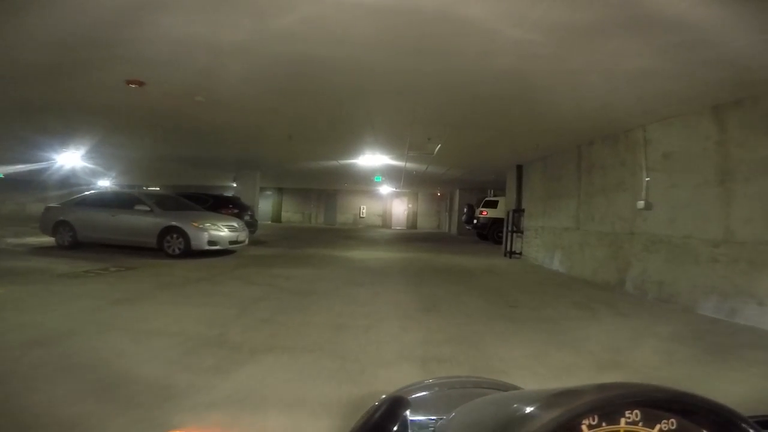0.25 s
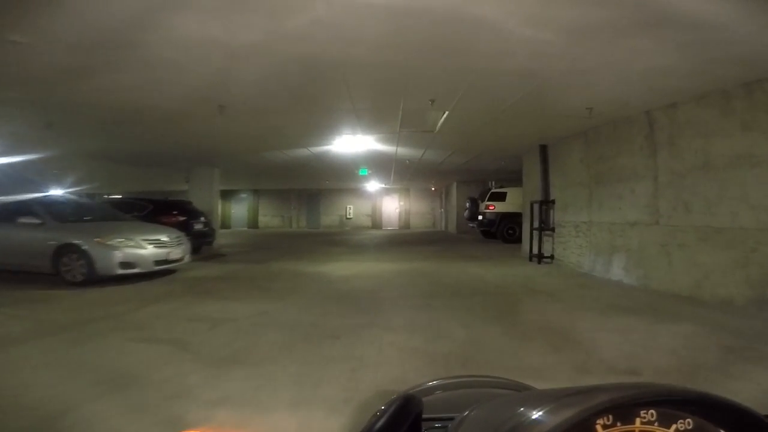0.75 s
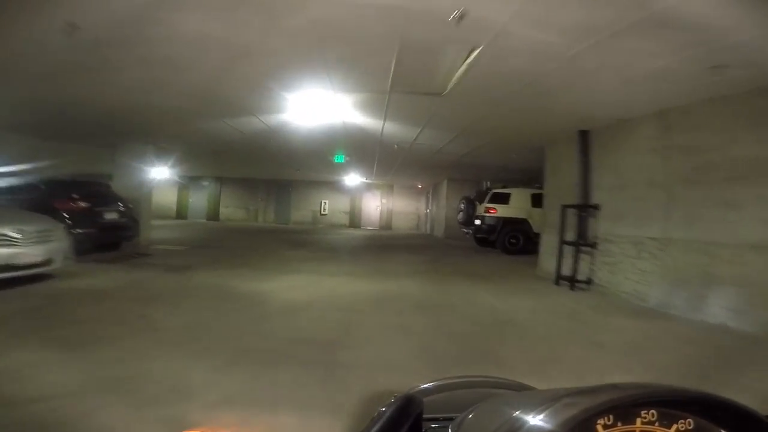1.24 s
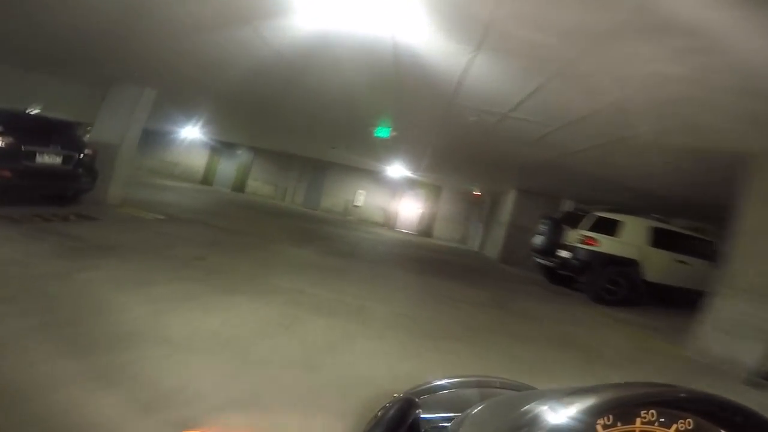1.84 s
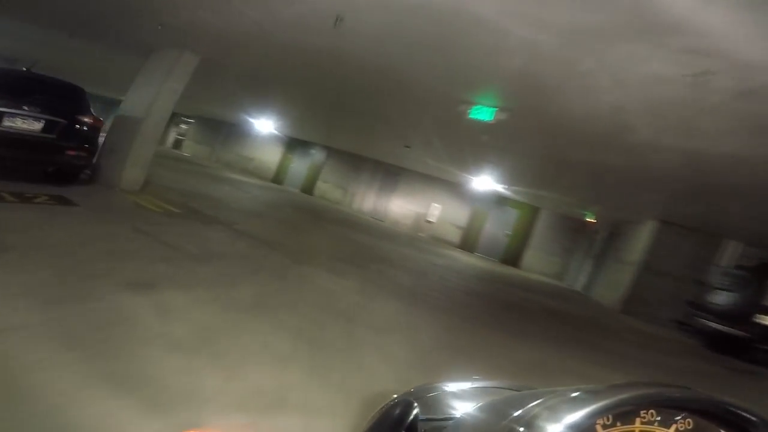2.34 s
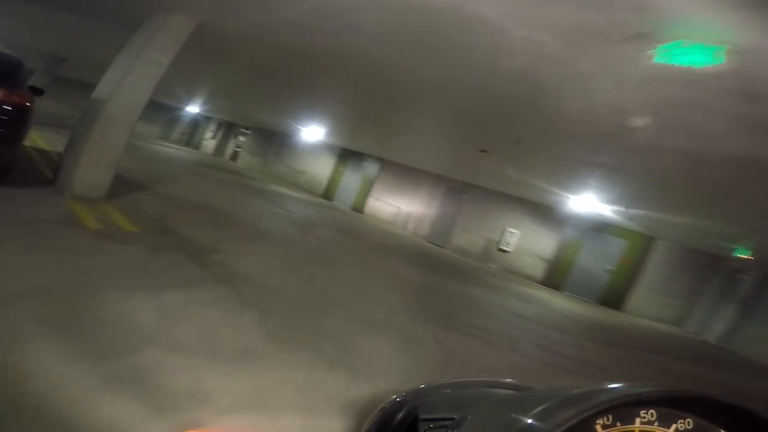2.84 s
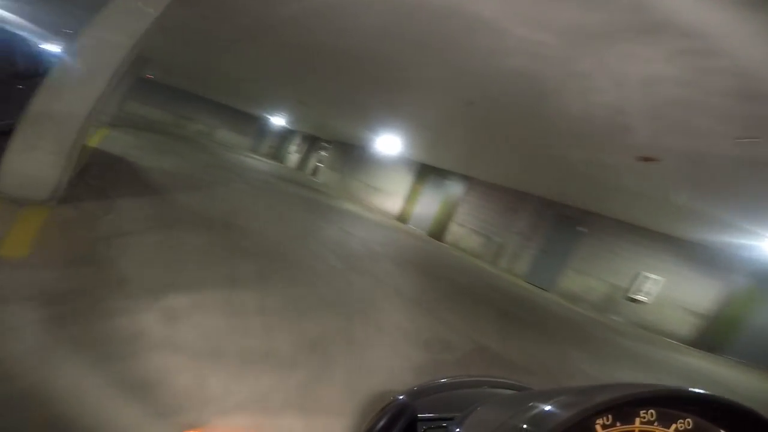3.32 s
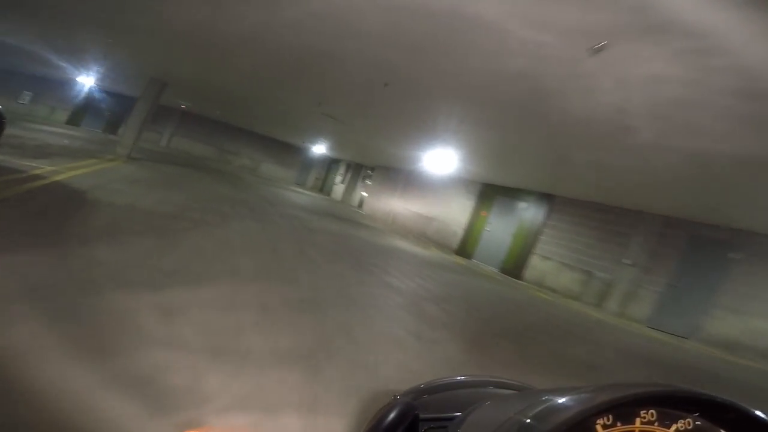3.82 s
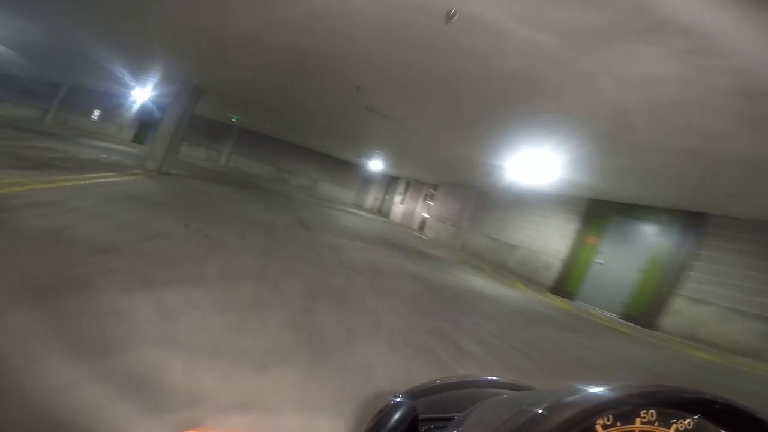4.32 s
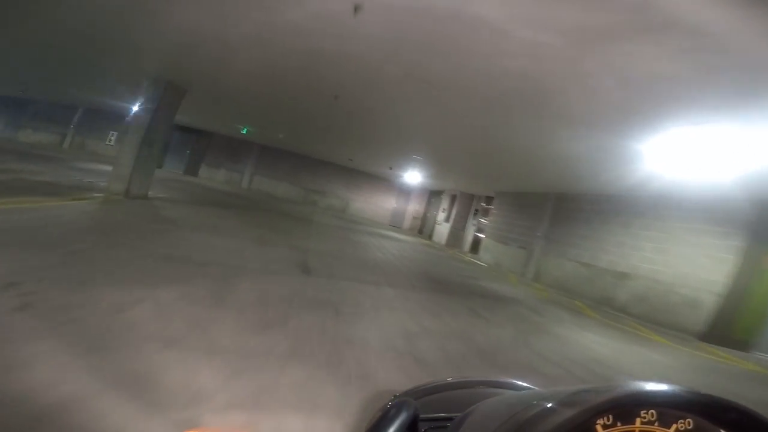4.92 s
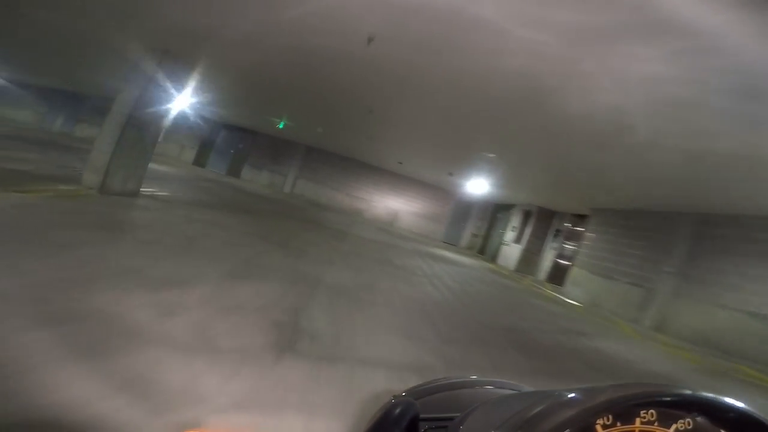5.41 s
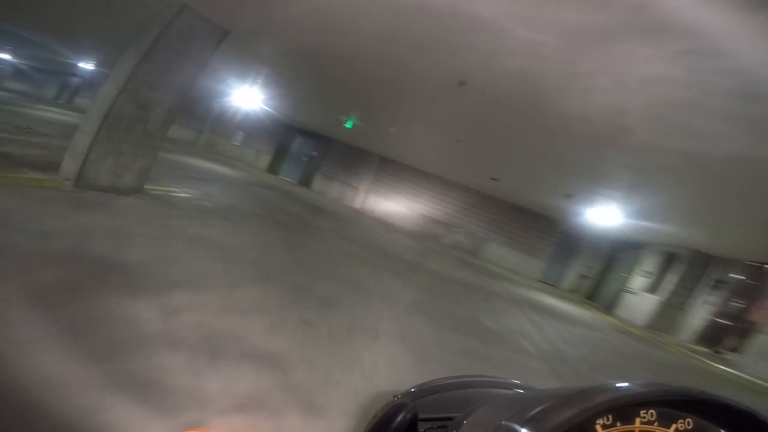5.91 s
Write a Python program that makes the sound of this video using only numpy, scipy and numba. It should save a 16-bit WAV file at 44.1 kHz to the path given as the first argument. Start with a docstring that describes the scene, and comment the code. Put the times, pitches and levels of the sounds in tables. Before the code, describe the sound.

A motorcycle drones slowly through a concrete parking garage while the camera knocks and rattles in its mount.

```python
"""A low exhaust drone and hollow knocks: a motorcycle rolls through a concrete parking garage,
slowly gaining speed from just above idle. Periodic firing gives the drone its harmonics, and the
scatter between firings a rumble in the hall; meshing gears whine and the valve gear hisses.
Engine vibration knocks the case of a camera on the bike against its mount, exciting its damped
modes, and gain control ducks after the hard knocks."""
import sys
import numpy as np
from scipy import signal
from scipy.fft import rfft, irfft, next_fast_len
from scipy.io import wavfile
from scipy.ndimage import uniform_filter1d, minimum_filter1d, map_coordinates
from numba import njit

SR = 44100
rng = np.random.default_rng(int(sys.argv[2]) if len(sys.argv) > 2 else 0)


def to_wav(sig):
    """Store sig (one row per channel, or 1-D mono) as 16-bit WAV at the path in sys.argv[1].

    Samples outside -1..1 are clipped; the rate is SR.
    """
    pcm = np.clip(np.atleast_2d(sig), -1, 1) * 32767
    pcm = np.round(pcm).astype(np.int16)
    wavfile.write(sys.argv[1], SR, pcm.T)  # frames by channels


N = 271656
TIME = np.arange(N) / SR

# Levels are relative within each table.
# rate of four-stroke cycles, creeping up from idle: t/s, f/Hz
CYCLE_RATE = [(0.0, 22.53), (0.7, 23.1), (1.23, 23.13), (1.41, 23.56), (1.94, 23.69), (2.46, 24.16),
              (3.34, 24.24), (4.58, 24.6), (6.16, 25.47)]
# spectrum of the exhaust's rumble in the hall: f/Hz, level/dB
RUMBLE_SPECTRUM = [(20, -10.5), (45, -6.5), (72, 2), (110, -5.5), (145, -4.5), (177, 2), (205, -16.5),
                   (240, -11), (400, -13.5), (495, -10.5), (600, -23), (800, -24.5), (1300, -77.5)]
# two faint squeaks: t/s, f/Hz, half-width/s, level/dB
SQUEAKS = [(4.964, 4230, .012, -43), (5.833, 4300, .012, -41)]
# envelope of the engine's clatter: t/s, level/dB
CLATTER_LEVEL = [(0, -46), (.7, -45.5), (1.05, -43.8), (3.3, -43.6), (3.8, -45.2), (5, -43.9),
                 (6.16, -43.8)]
# spectrum of the clatter: f/Hz, level/dB
CLATTER_SPECTRUM = [(600, 6.5), (750, 16), (950, 19.5), (1130, 23), (1300, 10.5), (1800, 6.5), (2080, 6.5),
                    (2500, 3), (3100, -2.5), (3700, -0.5), (5600, -2.5), (6800, -8), (8800, -13),
                    (11000, -27.5), (15000, -36)]
# fixed resonances of the hall that colour the clatter: f/Hz, bandwidth/Hz, gain/dB
HALL_MODES = [(1575, 120, -5.5), (2064, 15, 2.5), (2260, 100, -13), (2736, 31, -0.5), (3550, 90, -6),
              (5065, 47, -7), (7250, 140, -2.5)]
# gear whine, strong at idle and again once rolling: t/s, level/dB
WHINE_LEVEL = [(0, -33.5), (.7, -34.5), (.95, -40.5), (3, -49), (4.55, -42), (4.9, -33), (5.65, -33.5),
               (5.85, -41), (6.16, -39)]
# shaking of the mount, strongest under load: t/s, force level/dB
SHAKE_LEVEL = [(0, -40), (.85, -60.5), (1.75, -40), (3.4, -36), (3.8, -53.5), (4.8, -47.5), (5.15, -45),
               (6.16, -45.5)]
# the three jolts of each engine cycle: phase/cycles, force level/dB
JOLTS = [(.21, -4.5), (.66, -6.5), (.93, -8)]
# hard knocks of the case in its mount: t/s, force level/dB
KNOCKS = [(0.0331, -29.5), (0.297, -26.5), (0.385, -29), (1.1212, -33), (1.3136, -36), (1.3828, -30),
          (1.5947, -28), (1.7402, -29), (1.865, -32.5), (1.878, -30.5), (1.9091, -29), (2.0601, -28.5),
          (2.2039, -27.5), (2.2149, -30), (2.2445, -31), (2.2852, -31), (2.3101, -29), (2.3284, -24),
          (2.395, -31), (2.4126, -23.5), (2.5165, -31), (2.7842, -28), (2.8036, -27), (2.9075, -26),
          (3.1773, -30.5), (3.2782, -31.5), (3.3311, -22.5), (3.4235, -27.5), (3.466, -26.5), (3.495, -27),
          (3.5091, -27.5), (3.6083, -33), (3.8552, -25.5), (3.9482, -36), (3.9479, -34), (4.0599, -29),
          (4.14, -34), (4.193, -30.5), (4.2228, -24.5), (5.0299, -32), (5.0943, -35), (5.1118, -32),
          (5.5348, -33), (5.5516, -24.5), (5.8784, -31.5), (5.949, -29.5), (6.1455, -26)]
# low modes of the case: f/Hz, level/dB, T60/s, sign of the first swing
THUD_MODES = [(72, -7.5, 0.018, 1), (180.5, -12.5, 0.082, -1), (273.2, -8, 0.027, -1),
              (449, -2.5, 0.011, 1), (532.6, -12, 0.017, -1), (875, -4, 0.013, 1), (916, -6.5, 0.012, -1),
              (1954, -24.5, 0.01, -1), (2071, -28, 0.017, 1)]
# its thin, high modes: f/Hz, level/dB, T60/s, sign of the first swing
RING_MODES = [(5760, -34.5, 0.037, -1), (6030, -30, 0.013, 1)]
# spectrum of the contact noise: f/Hz, level/dB
CRACK_SPECTRUM = [(300, 5.5), (900, 14), (1400, 7), (2100, 1), (3000, -4), (4800, -6), (6000, -2),
                  (6700, -9), (9000, -8.5), (11000, -30.5), (15000, -32.5)]
# exhaust harmonics: multiple of the cycle rate, level/dB
HARMONICS = [(2, 0.5), (3, -1), (4, -4.5), (6, -15), (8, -24), (9, -13.5), (10, -18), (11, -32), (12, -21),
             (13, -31.5), (14, -15), (15, -24), (16, -25.5), (20, -18), (21, -23), (23, -21.5), (28, -27.5)]
# 5th harmonic, swelling and fading through the hall's standing waves: t/s, level/dB
FIFTH_LEVEL = [(0.0, -22), (1.23, -18.5), (1.58, -31), (2.11, -18), (2.82, -19), (2.99, -27.5),
               (4.05, -22.5), (4.22, -29), (4.4, -16), (4.75, -23.5), (5.81, -15.5), (6.16, -22.5)]
# 7th harmonic, booming as the revs lift it into a hall resonance: t/s, level/dB
SEVENTH_LEVEL = [(0.0, -25), (1.23, -35), (1.76, -20.5), (2.82, -20), (3.34, -20), (3.52, -27),
                 (5.1, -19.5), (5.46, -24.5), (6.16, -22.5)]


def undb(db):
    """Amplitude ratio of a level in decibels."""
    return 10 ** (np.asarray(db) / 20)


def unit(x):
    """Normalisation to rms 1."""
    return x / np.sqrt(np.mean(x ** 2))


def curve(table):
    """Linear interpolation of a table in time."""
    return np.interp(TIME, *np.transpose(table))


def wander(rate):
    """Slow noise of rms 1: a spline through `rate` random values a second."""
    knots = rng.standard_normal(2048)
    spline = map_coordinates(knots, [TIME[::64] * rate + 2], order=3, mode="wrap")
    return unit(spline.repeat(64)[:N])


def colour(x, spectrum):
    """Spectral shaping on a logarithmic frequency axis; rms 1."""
    hz, db = np.transpose(spectrum)
    size = next_fast_len(N + SR // 4)
    f = np.maximum(np.fft.rfftfreq(size, 1 / SR), 1)
    gain = undb(np.interp(np.log(f), np.log(hz), db))
    return unit(irfft(rfft(x, size) * gain, size)[:N])


def lowpass(x, hz):
    """Second-order roll-off above `hz`."""
    return signal.sosfilt(signal.butter(2, hz, fs=SR, output="sos"), x)


def impulses(times, sizes):
    """Impulse train with one spike for each blow."""
    return np.bincount(np.clip(times * SR, 0, N - 1).astype(int), sizes, N)


def strike(times, sizes, modes):
    """Modal superposition: each blow excites a sum of damped sinusoids."""
    t = TIME[:SR // 8]
    response = sum(np.sign(sign) * undb(db - 60 * t / t60) * np.sin(2 * np.pi * hz * t)
                   for hz, db, t60, sign in modes)
    return signal.fftconvolve(impulses(times, sizes), response)[:N]


@njit
def peak_envelope(magnitude, release):
    """Peak detection: instant rise, exponential decay."""
    out, held = np.empty(len(magnitude)), 0.
    for i in range(len(magnitude)):
        held = max(magnitude[i], held * release)
        out[i] = held
    return out


def hall_rumble(cycle, level_db=-17.5, throb=0.32):
    """Amplitude-modulated noise: scatter between firings fills the hall, throbbing twice a cycle."""
    puffs = 1 + throb * np.cos(4 * np.pi * cycle)
    return undb(level_db) * colour(puffs * rng.standard_normal(N), RUMBLE_SPECTRUM)


def squeaks(waver_rad=0.92):
    """Random phase modulation makes two short tone bursts unsteady."""
    out = 0
    for at, hz, half_width, db in SQUEAKS:
        envelope = undb(db) * np.exp(-((TIME - at) / half_width) ** 2)
        out += envelope * np.sin(2 * np.pi * hz * TIME + waver_rad * wander(200))
    return out


def valve_clatter(cycle, gain_db=13.5, tick_depth=0.75, grain_db=2, flicker_db=0.5):
    """Resonance: the ticks of valves and chain ring in the hall; the concrete smears them into a hiss."""
    ticks = np.exp(-(4 * cycle % 1))  # four a cycle
    envelope = 1 + tick_depth * ticks * undb(grain_db * wander(90))
    hiss = colour(envelope * rng.standard_normal(N), CLATTER_SPECTRUM)
    rings = sum(undb(db) * signal.lfilter(*signal.iirpeak(hz, hz / width, fs=SR), hiss)
                for hz, width, db in HALL_MODES)
    return undb(curve(CLATTER_LEVEL) + gain_db + flicker_db * wander(20)) * (hiss + rings)


def gear_whine(cycle, meshes_per_cycle=46, side_db=-11, flutter_db=3.0, waver_rad=0.95):
    """Teeth sound at their meshing frequency; the crank's uneven turning adds two sidebands."""
    whine_db = curve(WHINE_LEVEL)
    out = 0
    for offset, db in ((-2.2, side_db), (0, 0), (1.8, side_db)):
        phase = 2 * np.pi * (meshes_per_cycle + offset) * cycle + waver_rad * wander(10)
        out += undb(whine_db + db + flutter_db * wander(25)) * np.sqrt(2) * np.sin(phase)
    return lowpass(out, hz=2500)


def taps(cycle, scatter_db=5.5, burst_db=7.0, jitter_s=0.0007, clear_s=0.007,
         bounce_db=8.5, bounce_s=0.0067, limit_db=-32):
    """Forced vibration: times and forces of the case's soft taps, one at each engine jolt."""
    turns = np.arange(1, int(cycle[-1]))
    times = np.concatenate([np.interp(turns + phase, cycle, TIME) for phase, _ in JOLTS])
    jolt_db = np.repeat([db for _, db in JOLTS], len(turns))
    jitter, scatter = rng.standard_normal((len(times), 2)).T
    since_knock = times[:, None] - np.transpose(KNOCKS)[0]
    # a hard knock leaves the case bouncing, so a tap just after it lands harder
    bounce = ((since_knock > 0) * np.exp(-np.abs(since_knock) / bounce_s)).max(axis=1)
    shake_db = curve(SHAKE_LEVEL) + burst_db * wander(20)
    force_db = np.interp(times, TIME, shake_db) + jolt_db + bounce_db * bounce + scatter_db * scatter
    cushioned = undb(np.minimum(force_db, limit_db))
    clear_of_knocks = np.abs(since_knock).min(axis=1) > clear_s
    return times + jitter_s * jitter, clear_of_knocks * cushioned


def case_impacts(cycle, thud_db=20.5, ring_db=29.0, crack_db=5.0, crack_s=0.0028, give_s=0.0008):
    """Impact excitation: each tap and knock makes the camera case thud, ring and crack."""
    knock_times, knock_db = np.transpose(KNOCKS)
    tap_times, tap_force = taps(cycle)
    times = np.r_[knock_times, tap_times] + give_s  # the mount yields before hard plastic meets
    force = np.r_[undb(knock_db), tap_force]
    # the thud grows more slowly than the force, so harder contacts are brighter
    thud = strike(times, undb(thud_db) * force ** 0.57, THUD_MODES)
    ring = lowpass(strike(times, undb(ring_db) * force, RING_MODES), hz=10000)
    bursts = signal.lfilter([1], [1, -np.exp(-1 / (crack_s * SR))], impulses(times, force))
    crack = undb(crack_db) * lowpass(bursts, hz=1500) * colour(rng.standard_normal(N), CRACK_SPECTRUM)
    return thud + ring + crack


def exhaust(cycle, gain_db=-17.5, fifth_gain_db=1.35, seventh_gain_db=0.5,
            sway_db=1.0, boom_sway_db=1.56, dispersion_rad=0.765, drift_rad=0.095):
    """Harmonic series: uneven firings sound multiples of the cycle rate; the pipe smears each pulse."""
    harmonics = [(k, gain_db + db) for k, db in HARMONICS]
    harmonics.append((5, curve(FIFTH_LEVEL) + fifth_gain_db))
    harmonics.append((7, curve(SEVENTH_LEVEL) + seventh_gain_db + boom_sway_db * wander(14)))
    out = 0
    for k, db in harmonics:
        # moving past the walls shifts short waves more than long ones
        drift = drift_rad * (k - 2) * wander(3)
        phase = 2 * np.pi * k * cycle + dispersion_rad * k ** 2 + drift
        out += undb(db + sway_db * wander(5)) * np.sqrt(2) * np.cos(phase)
    return lowpass(out, hz=820)


def scene(start_cycle=0.454):
    """Superposition: one crankshaft times the engine's sounds and the taps; knocks and squeaks join."""
    cycle = start_cycle + np.cumsum(curve(CYCLE_RATE)) / SR
    engine = exhaust(cycle) + hall_rumble(cycle) + gear_whine(cycle) + valve_clatter(cycle)
    return (engine + case_impacts(cycle) + squeaks())[None]


def record(dry, threshold=0.72, duck=0.71, attack_hz=30, release_s=0.086, ceiling=0.95, top_hz=15600):
    """Compression: gain ducks after a loud peak, a limiter catches the peak itself, the top is cut."""
    envelope = peak_envelope(np.abs(dry[0]), np.exp(-1 / (release_s * SR)))
    excess = lowpass(np.log(np.maximum(envelope / threshold, 1)), attack_hz)
    ducked = dry * np.exp(-duck * excess)
    limiter_gain = minimum_filter1d(ceiling / np.maximum(np.abs(ducked[0]), ceiling), size=90)
    limited = ducked * uniform_filter1d(limiter_gain, size=90)
    return signal.sosfilt(signal.ellip(8, 0.2, 70, top_hz, fs=SR, output="sos"), limited)


dry = scene()
out = record(dry)
to_wav(out)
```